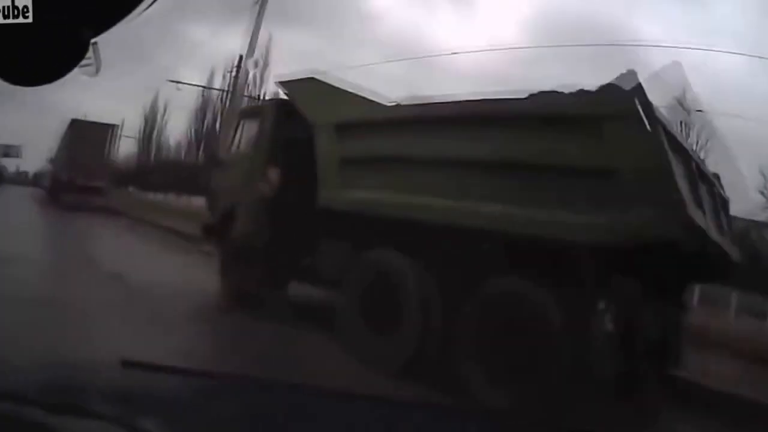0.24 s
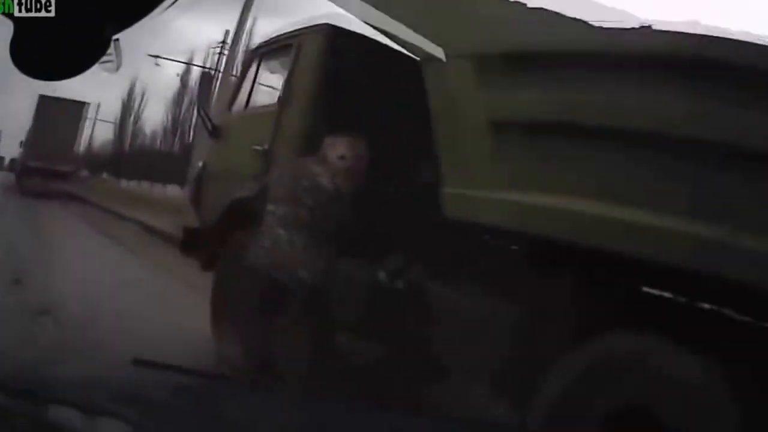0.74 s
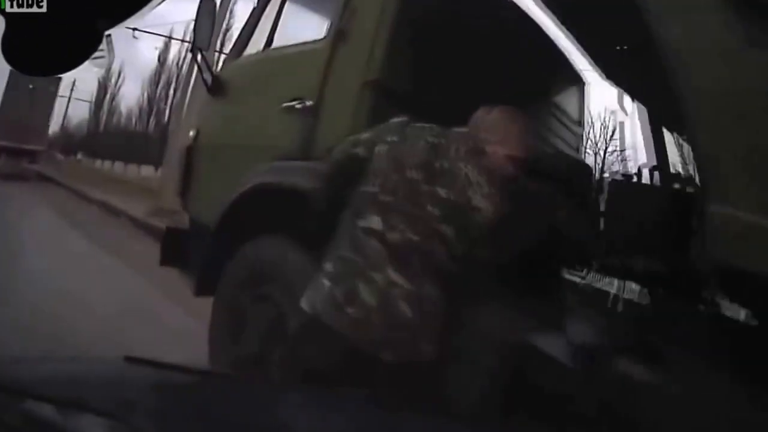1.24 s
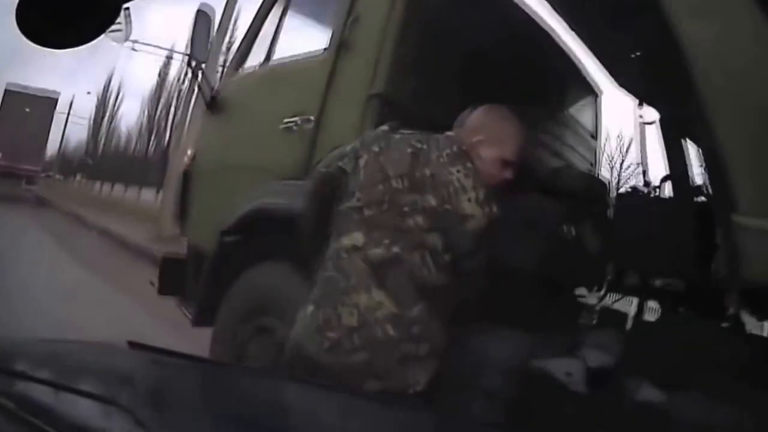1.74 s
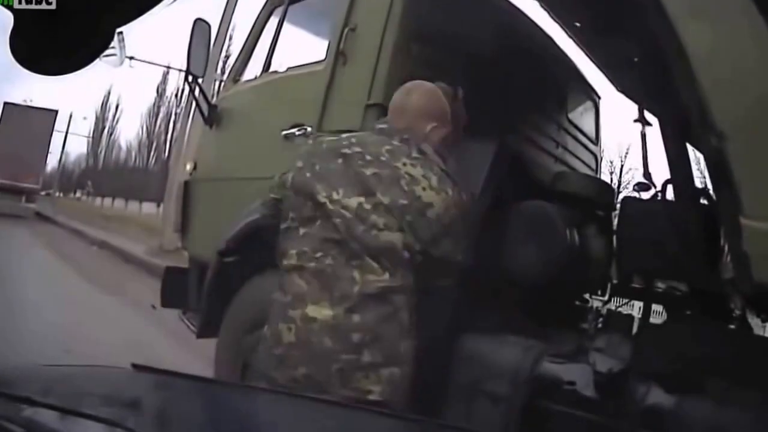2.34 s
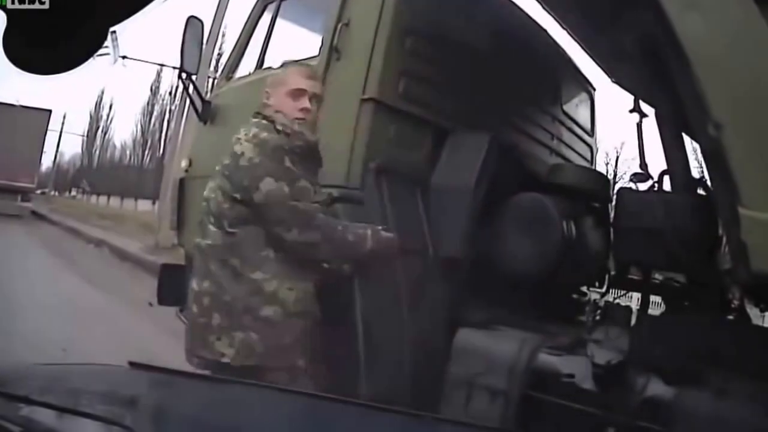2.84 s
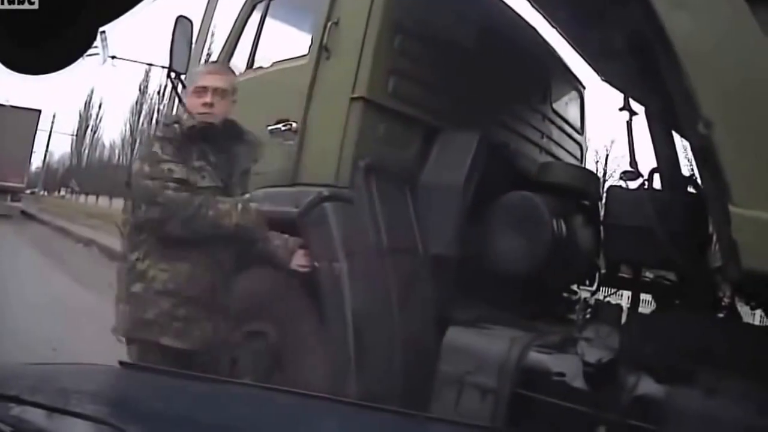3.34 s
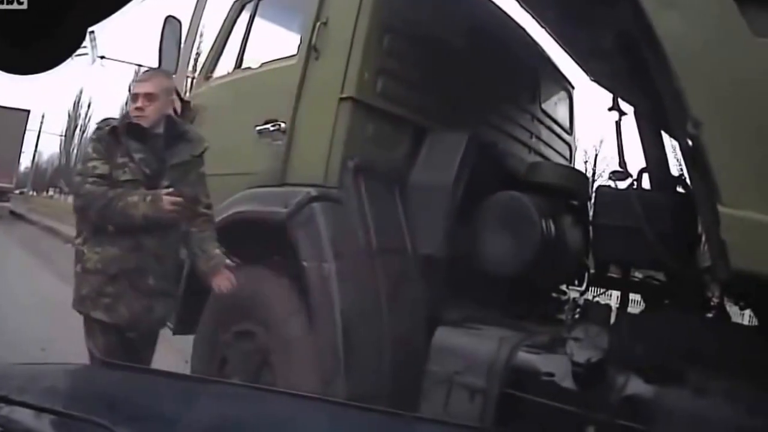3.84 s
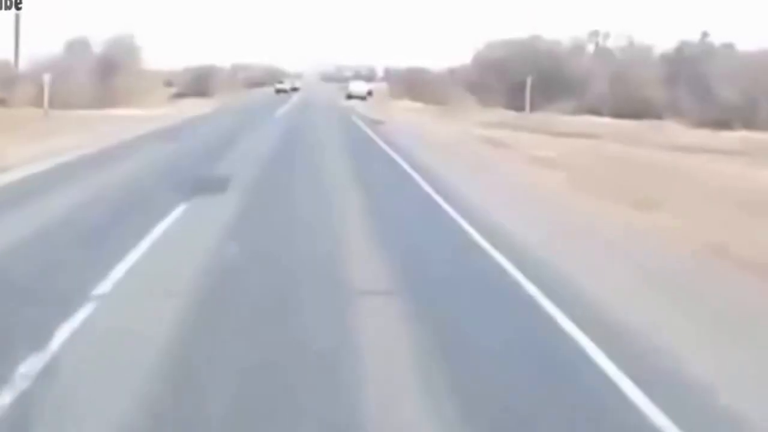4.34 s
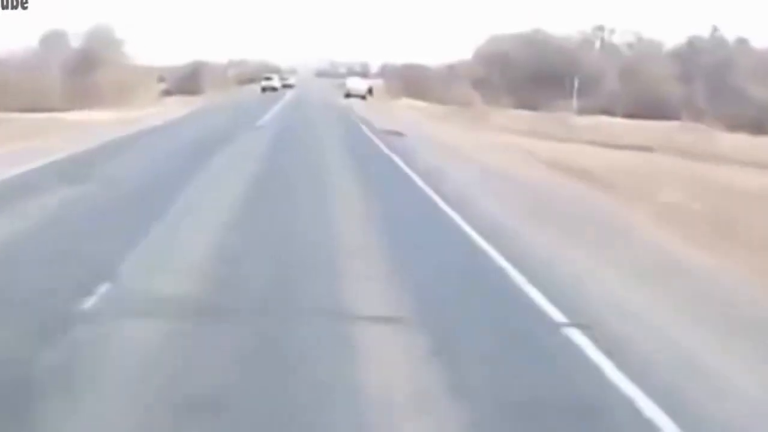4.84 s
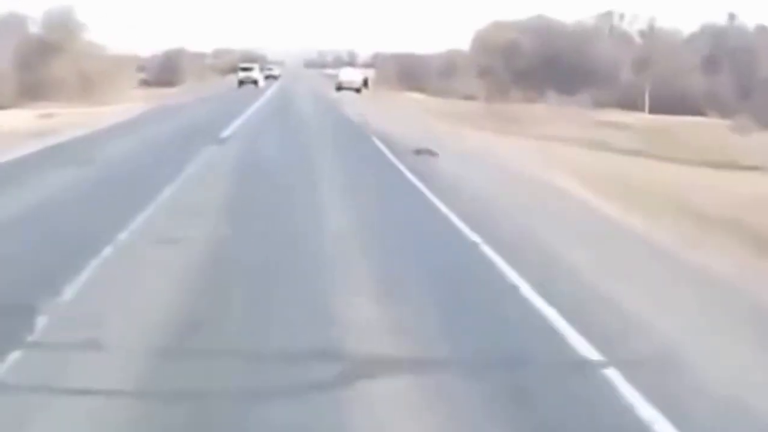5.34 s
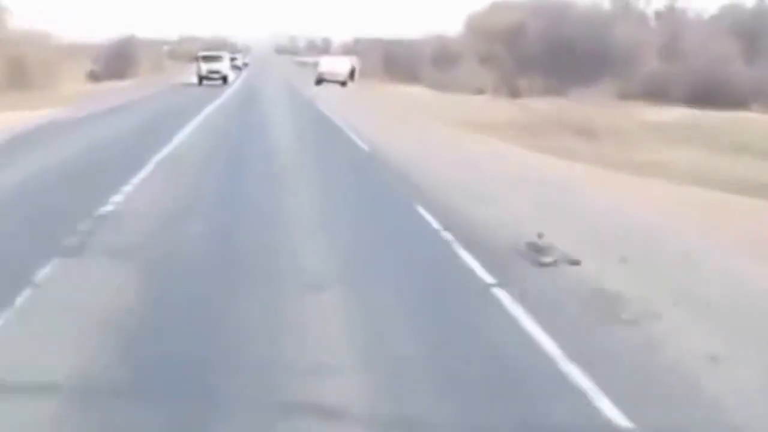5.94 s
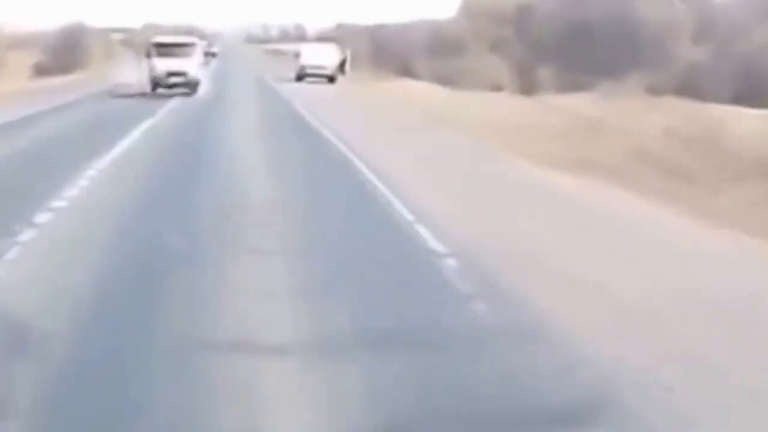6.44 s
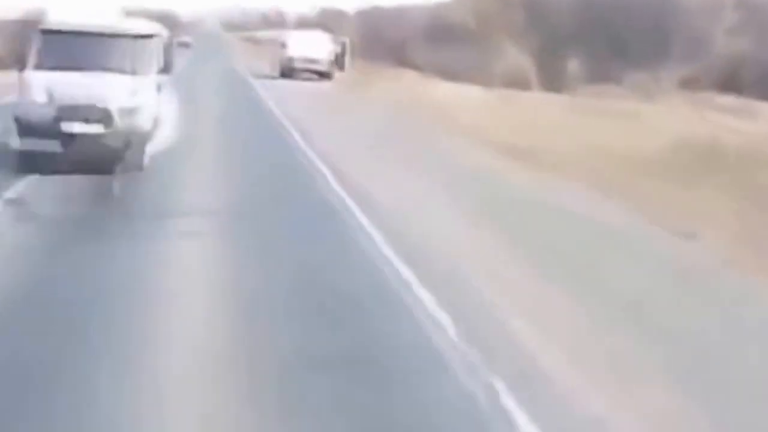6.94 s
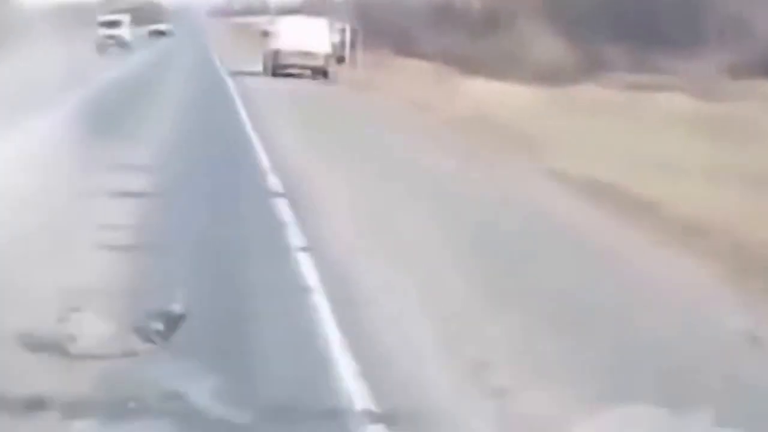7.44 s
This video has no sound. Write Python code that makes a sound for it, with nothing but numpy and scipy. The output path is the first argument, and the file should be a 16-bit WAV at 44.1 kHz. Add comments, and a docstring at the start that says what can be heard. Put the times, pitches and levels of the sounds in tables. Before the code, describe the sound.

Inside a car, a quiet stop with trim knocks cuts to highway roar, then a loud distorted crash with breaking glass and scraping.

```python
"""Two scenes from inside a car. First it brakes to a stop beside a lorry: the tyre noise is gone by 1.9 s,
and the trim knocks, squeaks and rustles. At 4.3 s, a hard cut to highway speed: body rumble, tyre roar
and a growing hiss. At 5.8 s a collision slams the microphone from rail to rail as metal buckles, the
shell booms and glass breaks. Crumbs of glass tinkle down while the wreck scrapes and groans along the
road, then the car rides roughly on over thumping wreckage and gravel, its loose parts rattling."""
import sys
import numpy as np
from scipy import signal
from scipy.fft import rfft, irfft
from scipy.io import wavfile

SR = 44100
rng = np.random.default_rng(int(sys.argv[2]) if len(sys.argv) > 2 else 0)


def pcm_store(signal):
    """Save signal as 16-bit PCM."""
    levels = np.round(np.clip(np.atleast_2d(signal), -1, 1) * 32767)
    wavfile.write(sys.argv[1], SR, levels.astype(np.int16).T)


N = 339570
HIGHWAY_S, IMPACT_S, SLIDE_S = 4.3025, 5.785, 6.083   # main cues

# crunch of sheet metal and boom of the body: (frequency [Hz], level [dB])
METAL_EQ = [(150, -9.5), (300, -9), (550, 0), (950, -1), (1350, -2.5), (1900, -12.5), (2800, -23.5),
            (3900, -17), (5500, -43), (9000, -34.5)]
BOOM_EQ = [(120, -16), (175, -22.5), (210, -5.5), (260, -21.5), (400, -13.5), (700, -28)]
# resonances of the body shell: (frequency [Hz], level [dB], t60 [s])
SHELL_MODES = [(194.5, -1, 0.063), (272, 2, 0.058), (381, 4.5, 0.045), (483, -5, 0.13), (551.5, 0.5, 0.098),
               (633, -5, 0.12), (958, -2, 0.09), (1194, -6.5, 0.064), (1660, -8, 0.048)]
def collision(metal_gain, boom_gain, shell_gain):
    """Sheet metal buckles in dense snaps, torn pieces clang, and the shell booms and rings."""
    lead_in = envelope(IMPACT_S, hold=0, rise=69, fall=298)   # a grind swells into the hit
    snaps = grains(per_s=1100, spread_db=-0.5) * from_db(2.96 * drift(22))
    metal = coloured(snaps, METAL_EQ) + from_db(-14) * torn_pieces()
    crumpling = np.hypot(metal_gain, from_db(-18.5) * lead_in) * metal
    shell = rms_one(ring(grains(per_s=1200, spread_db=3), SHELL_MODES))
    ringing = np.hypot(shell_gain, from_db(-13.5) * lead_in) * shell
    return crumpling + boom_gain * noise(BOOM_EQ) + ringing


# hits on the car: (time [s], hold [s], fall [dB/s], metal [dB], boom [dB], shell [dB], heave [dB])
BODY_HITS = [(5.792, 0.04, 167, 9, 7, -1, -12), (5.856, 0.034, 152, -14, 2.5, -5, -1),
             (5.909, 0.12, 31.5, -0.5, -14.5, -7, -6.5), (6.144, 0.053, 60, -8, -16, -10.5, -17),
             (6.872, 0.16, 24, -23.5, -39, -24.5, -30), (7.315, 0.15, 58, -23.5, -21.5, -19.5, -12),
             (7.549, .04, 60, -22, -29, -18, -19.5), (7.624, 0.065, 47, -19, -28, -16.5, -15.5)]
def blows():
    """Four gain curves: how hard the hits drive metal, boom, shell and springs; their powers add."""
    power = 0
    for time, hold, fall, *levels_db in BODY_HITS:
        power = power + np.outer(from_db(levels_db), envelope(time, hold, rise=2200, fall=fall)) ** 2
    return np.sqrt(power)


# resonances of loose metal and glass: (frequency [Hz], level [dB], t60 [s])
DEBRIS_MODES = [(1200, 0.5, 0.036), (1630, -8, 0.079), (1820, -2.5, 0.036), (2474, -12, 0.04),
                (2660, -8, 0.05), (3427, 3.5, 0.043), (3910, -2.5, 0.097), (4640, -0.5, 0.014)]
def torn_pieces(count=3, size_spread=0.0627):
    """Pieces of slightly different size clang, each mode struck at its own moments; rms 1."""
    sizes = 1 + size_spread * np.linspace(-1, 1, count)
    return rms_one(sum(ring(grains(per_s=65, spread_db=3.5), [(hz / size, db, t60)])
                       for size in sizes for hz, db, t60 in DEBRIS_MODES))


# slams of cabin air: (time [s], hold [s], pressure [full scale])
AIR_SLAMS = [(5.786, 0.053, -1.7), (5.862, 0.0068, -1.4), (5.962, 0.0032, -1.92)]
def jolts():
    """Pressure waves cross the cabin, strong enough to pin the microphone and choke the other layers."""
    return sum(push * envelope(time, hold, rise=3000, fall=1500) for time, hold, push in AIR_SLAMS)


# parts breaking or rattling: (time [s], shower [dB], ring [dB], ring pitch [Hz])
BREAKS = [(4.329, -28, -35, 4100), (4.353, -26, -29, 3800), (4.37, -25, -38, 4700),
          (4.76, -22.5, -44, 3770), (4.814, -29, -35, 1710), (5.052, -24, -31, 3430),
          (5.129, -21.5, -43, 3820), (5.15, -27.5, -36, 3650), (5.205, -22.5, -29, 4230),
          (5.255, -24, -31, 3860), (5.782, 4.5, -23, 3600), (5.792, 14, -8, 4970), (5.806, 11.5, 6, 4240),
          (5.822, 6, -8, 3320), (5.837, 2, -13, 4600), (5.855, 2, 2, 5600), (5.881, 3, -2, 6300),
          (5.893, 8.5, -14, 3620), (5.954, 1, -10, 3900), (5.961, -4, -7, 5200), (5.977, 8, 6, 6240),
          (5.995, 5, -3, 3830), (6.033, -2, -9, 3740), (6.072, -2, -9, 3850), (6.097, -16, -8, 3740),
          (6.157, -2, -14, 2470), (6.199, -16, -19, 3900), (6.245, -27, -20, 3860), (6.275, -22, -14, 3830),
          (6.351, -24, -10.5, 3770), (6.426, -20, -19, 3780), (6.484, -26, -29, 3600),
          (6.519, -14, -18, 2890), (6.682, -30, -28, 3790), (6.831, -27, -20, 3800),
          (6.855, -12, -20, 4070), (6.93, -9.5, -17.5, 1760), (7.124, -13.5, -22, 3120),
          (7.263, -36, -43, 3850), (7.311, -13.5, -25, 1940), (7.341, -13.5, -20, 3800),
          (7.376, -6.5, -13.5, 1740), (7.391, -29, -27, 3540), (7.401, -26, -27, 3850),
          (7.419, -14.5, -34, 4350), (7.442, -23, -31, 3920), (7.449, -14, -32, 3600),
          (7.478, -12, -29, 1910), (7.507, -10.5, -19, 1720), (7.547, -18, -24, 3760),
          (7.587, -16, -30, 1800), (7.627, -9, -17, 1730), (7.671, -15, -14, 1420), (7.681, -21, -24, 3720),
          (7.686, -15, -11.5, 1690)]
# bright spray of splinters: (frequency [Hz], level [dB])
SHOWER_EQ = [(700, -15), (1700, 22.5), (2700, 3), (3900, 12.5), (6500, -5.5), (9000, -7)]
# resonances of one shard: (pitch multiple [ratio], level [dB], t60 [cycles])
SHARD_MODES = [(1, -1.5, 220), (1.07, -10, 92), (.93, -5.5, 90), (2.15, -20, 100)]
def cracks():
    """Glass and plastic break or rattle in short, bright showers, each leaving a shard ringing."""
    times, shower_db, ring_db, ring_hz = np.transpose(BREAKS)
    hits = strikes(times, shower_db)
    swell = from_db(5) * (dying(hits, t60=0.019) - dying(hits, t60=0.0062))   # rounded attack
    splinters = coloured(grains(per_s=8000, spread_db=1), SHOWER_EQ)
    return swell * splinters + pings(times, ring_db, ring_hz, SHARD_MODES)


def tinkle(low_hz=2603, high_hz=5410, count=12, t60_cycles=220):
    """Crumbs of glass rain down after the crash, the small, high ones more softly."""
    crumbs = sum(ring(grains(per_s=12, spread_db=1), [(hz, 0, t60_cycles / hz)]) / hz
                 for hz in np.geomspace(low_hz, high_hz, count))
    return from_db(-20.5) * envelope(6.014, hold=0.11, rise=160, fall=31) * rms_one(crumbs)


# tyres on coarse asphalt and the wreck's scrape: (frequency [Hz], level [dB])
ASPHALT_EQ = [(330, -4), (450, -3.5), (640, 0.5), (950, 7), (1250, -3), (1550, -17.5), (1850, -23.5)]
SCRAPE_EQ = [(450, -11), (750, 1.5), (950, 4), (1250, 0), (1550, -11.5), (1850, -27)]
def grinding():
    """Road grit hums under the tyres as the highway opens, and rasps far louder under the wreck."""
    asphalt = from_db(-29) * envelope(HIGHWAY_S, hold=0.073, rise=0, fall=10) * noise(ASPHALT_EQ)
    slide = from_db(-12.5) * envelope(SLIDE_S, hold=0.16, rise=60, fall=42)
    grit = grains(per_s=1500, spread_db=-0.5) * from_db(4.7 * drift(35))
    return asphalt + slide * coloured(grit, SCRAPE_EQ)


# notes of the rubbed panels: (pitch as the slide begins [Hz], width [Hz], level [dB])
GROAN_NOTES = [(962, 60, -6.5), (1547, 48, -8)]
def groaning(sag_per_s=0.2):
    """The road rubs the wreck's panels into rough notes that sag as it slows."""
    sag = np.exp(-sag_per_s * (seconds() - SLIDE_S))
    phase_per_hz = 2 * np.pi * np.cumsum(sag) / SR
    notes = 0
    for hz, width, db in GROAN_NOTES:
        phase = hz * phase_per_hz
        notes = notes + from_db(db) * (drift(width) * np.sin(phase) + drift(width) * np.cos(phase))
    return from_db(-12.5) * envelope(SLIDE_S, hold=0.12, rise=60, fall=36) * notes


# hits from below: (time [s], level [dB], pitch [Hz])
UNDERSIDE_HITS = [(6.891, -14, 560), (7.122, -13.5, 553), (7.199, -15, 582), (7.335, -6, 668),
                  (7.385, -12, 490), (7.42, -12, 575), (7.491, -9, 538), (7.604, -6, 379.4),
                  (7.661, -7.5, 492)]
# resonances of the wheel well: (pitch multiple [ratio], level [dB], t60 [cycles])
WHEEL_WELL_MODES = [(0.97, 2.5, 48), (0.529, -1.5, 28)]
def thumps():
    """Wreckage on the road knocks against the hollow underside."""
    return pings(*np.transpose(UNDERSIDE_HITS), WHEEL_WELL_MODES)


# crunch of scattered fragments: (frequency [Hz], level [dB])
GRAVEL_EQ = [(1300, 1), (1900, -0.5), (2700, -4), (3900, -4.5), (5000, -12), (8500, -24)]
def gravel():
    """Small fragments clatter against the underside at random, fading up toward the end."""
    hits = np.abs(grains(per_s=310, spread_db=2))
    crunch = rms_one(dying(hits, t60=0.017) * noise(GRAVEL_EQ))
    return from_db(-33.5) * envelope(7.56, hold=0.4, rise=20.5, fall=107) * crunch


# thin early hiss and the broad hiss of the crash: (frequency [Hz], level [dB])
THIN_HISS_EQ = [(2000, -3), (3000, -7), (3900, 5.5), (4300, -10), (4750, 2.5), (5100, -22.5)]
SCRUB_EQ = [(1400, -7), (2000, 5.5), (3000, -1), (4200, -4.5), (4800, -8), (5500, -18), (8000, -21)]
def scrubbing(thin_s=4.93):
    """A thin hiss leads in; a louder, rough one swells into the collision and dies after it."""
    thin = from_db(-51) * envelope(thin_s, hold=IMPACT_S - thin_s, rise=44, fall=107)
    loud = from_db(-31.5) * envelope(IMPACT_S, hold=0.94, rise=44, fall=107)
    flutter = from_db(2 * drift(30))
    return flutter * (thin * noise(THIN_HISS_EQ) + loud * noise(SCRUB_EQ))


# knocks in the cabin: (time [s], thud [dB], panel [dB], click [dB], ping [dB], ping pitch [Hz])
TRIM_KNOCKS = [(0.036, -45, -4.5, -25.5, -28, 2970), (0.042, -42, -26, -28, -34, 4100),
               (0.087, -51, -15, -30, -27, 3300), (0.183, -48, -16, -37, -34, 4900),
               (0.192, -37, -19, -29, -28.5, 7470), (0.461, -48, -27, -44, -42, 4170),
               (0.482, -40, -17, -43, -38, 4230), (0.59, -17, -6.5, -23, -42, 3300),
               (0.881, -57, -39, -44, -40, 2310), (1.012, -33, -30, -43, -39, 2500),
               (1.135, -46, -26, -36, -46, 3600), (1.341, -60, -23, -36, -40, 5000),
               (1.453, -63, -36, -39, -47, 4600), (1.509, -50, -34, -36, -36, 3150),
               (1.53, -48, -33, -47, -41, 4680), (1.542, -39, -33, -49, -36, 1920),
               (1.564, -38, -31, -32.5, -29, 3230), (1.655, -38, -26, -25.5, -33, 4700),
               (1.68, -47, -18, -39, -38, 2300), (1.746, -54, -24, -35, -38, 2360),
               (1.897, -61, -22, -37, -35, 2250), (2.028, -55, -16, -39, -41, 1890),
               (2.746, -32.5, -11, -28.5, -30.5, 4910), (2.966, -66, -52, -34, -31.5, 3550),
               (3.348, -42, -19, -36, -57, 4800)]
# resonances of the hollow dashboard and of its panels: (frequency [Hz], level [dB], t60 [s])
DASHBOARD_MODES = [(75, -19, 0.06), (128, -17.5, 0.066), (374, -3, 0.056), (445, -1.5, 0.052),
                   (544, 3, 0.02)]
PANEL_MODES = [(714, -8.5, 0.019), (860, -6, 0.03), (1060, -2, 0.03), (1270, -13, 0.06),
               (1595, -10.5, 0.015), (2024, -22, 0.077)]
# resonances of a plastic fastener: (pitch multiple [ratio], level [dB], t60 [cycles])
PLASTIC_MODES = [(1, -2.5, 174), (1.11, -5.5, 100), (.88, -7, 89), (0.66, -12, 100)]
def knocks(bounce_s=0.0054, bounce_db=-6):
    """Each knock bounces once and rings the dashboard and panels, topped by a plastic crack and ping."""
    times, thud_db, panel_db, click_db, ping_db, ping_hz = np.transpose(TRIM_KNOCKS)
    bounces = times + bounce_s * rng.uniform(0.7, 1.3, len(times))
    thud, panel, click = [strikes(times, db) + strikes(bounces, db + bounce_db)
                          for db in (thud_db, panel_db, click_db)]
    body = ring(thud, DASHBOARD_MODES) + from_db(-8) * ring(panel, PANEL_MODES)
    scatter = from_db(-22.5) * dying(panel, t60=0.073) * noise(TYRE_EQ)   # padded cabin: a short tail
    bright = noise([(1500, 11), (3200, 4), (5000, 1.5), (8000, -8.5)])
    crack = from_db(-4.5) * dying(click, t60=0.046) * bright
    return body + scatter + crack + pings(times, ping_db, ping_hz, PLASTIC_MODES)


# squeaks and scrapes: (centre time [s], length [s], pitch [Hz], rasp [0-1], level [dB])
TRIM_SQUEAKS = [(0.309, .03, 5100, 0.96, -46), (0.318, 0.025, 1170, 0.1, -30.5),
                (0.408, 0.023, 1285, 0.3, -28.5), (0.737, 0.028, 1290, 0.16, -23.5),
                (1.675, 0.14, 2120, 0.87, -37), (1.683, 0.27, 2470, 0.57, -44),
                (1.834, 0.083, 5580, .6, -49), (1.968, 0.18, 5520, 0.65, -56), (1.93, 0.095, 996, 0.4, -43)]
def squeaks(pitch_shake=0.055):
    """Rubbing surfaces sing briefly; stick and slip shake the pitch and break the note into a rasp."""
    out = 0
    for centre, length, hz, rasp, db in TRIM_SQUEAKS:
        swell = np.exp(-((seconds() - centre) * 2 / length) ** 4)
        pitch = hz * (1 + pitch_shake * rasp * drift(242))
        phase = 2 * np.pi * np.cumsum(pitch) / SR
        grip = np.sqrt(1 - rasp ** 2) + rasp * drift(150)
        out = out + from_db(db) * swell * grip * (np.sin(phase) + from_db(-23) * np.sin(2 * phase))
    return out


# things shifting in the cabin: (time [s], hold [s], dull scuff [dB], bright rustle [dB])
SHIFTS = [(0, 0.015, -30.5, -40.5), (0.19, 0.075, -46, -51), (1.014, 0.052, -43.5, -60),
          (1.508, 0.081, -41, -51), (1.654, 0.027, -38, -42), (1.814, 0.24, -51, -50.5),
          (2.293, 0.25, -72, -53), (2.82, 0.037, -52, -54), (3.497, 0.33, -53.5, -53.5)]
# their papery top end: (frequency [Hz], level [dB])
RUSTLE_EQ = [(900, -13), (1500, -3), (2300, -3.5), (3000, -5.5), (4500, -8.5), (5600, -12), (6400, -20),
             (7500, -11.5), (8200, -22)]
def rustles(moving_db=-47.5, still_db=-72):
    """Loose things rustle while the car moves, and in spells as they shift, each with a dull scuff."""
    scuff_power = 0
    rustle_power = (from_db(moving_db) * speed()) ** 2 + from_db(still_db) ** 2
    for time, hold, scuff_db, rustle_db in SHIFTS:
        spell = envelope(time, hold, rise=166, fall=105)
        scuff_power += (from_db(scuff_db) * spell) ** 2
        rustle_power += (from_db(rustle_db) * spell) ** 2
    friction = rng.standard_normal(N) + 0.5 * grains(per_s=400, spread_db=1)
    scuff = np.sqrt(scuff_power) * noise(TYRE_EQ)
    flutter = from_db(2 * drift(30))
    return scuff + np.sqrt(rustle_power) * flutter * coloured(friction, RUSTLE_EQ)


# low end of the body on its springs, and tyre roar at speed: (frequency [Hz], level [dB])
RUMBLE_EQ = [(12, -4.5), (22, -3), (45, -5.5), (70, -9.5), (100, -12), (150, -22), (250, -51.5)]
ROAR_EQ = [(76, -27.5), (130, -4.5), (182, 5.5), (246, -1), (304, 6), (345, -4), (641, 3), (779, -1),
           (947, -2.5), (1480, -10), (2340, -30.5), (3910, -33.5), (4350, -42), (7280, -42.5), (9000, -45),
           (11700, -74.5), (19800, -120)]
def highway(heave):
    """The body rumbles and the tyres roar, both louder when a hit heaves the car; loose trim ticks."""
    rumble = np.hypot(from_db(-17.5), heave) * noise(RUMBLE_EQ)
    roar = np.hypot(from_db(-19.5), from_db(-7.5) * heave) * noise(ROAR_EQ)
    ticks = (rng.random(N) < 90 / SR) * rng.random(N)   # about 90 a second
    bright = noise([(1700, -5), (2700, 5), (3900, 2.5), (4900, 1), (5600, -22), (8000, -13.5)])
    return rumble + roar + from_db(-42.5) * dying(ticks, t60=0.063) * bright


# slow tyres, rolling drone, judder and street bed: (frequency [Hz], level [dB])
TYRE_EQ = [(110, -82), (180, -19.5), (225, -14), (340, -7.5), (389, -10), (435, -3), (538, -11), (851, 0.5),
           (1270, -4), (1360, -9), (1490, -7.5), (2150, -17.5), (2600, -16.5), (3380, -24), (5720, -120)]   # also colours the scuffs and the knocks' tails
DRONE_EQ = [(50, -10), (85, -5), (125, 0), (160, -4), (230, -22)]
JUDDER_EQ = [(60, -5.5), (100, -6), (130, -2), (170, -28), (300, -12.5), (480, -18)]
STREET_EQ = [(100, -11), (170, -31.5), (300, -6.5), (420, -9.5), (560, -7.5), (800, 1), (1000, 1.5),
             (1300, -6), (2300, -7), (3200, -15), (5000, -21.5), (8000, -24.5)]
def slowing_car():
    """Tyre noise, sway and a low drone fade into the street's hush as the car judders to a stop."""
    tyres = from_db(-29.5 + drift(40)) * speed() ** 2.24 * noise(TYRE_EQ)
    sway = from_db(-45.5) * speed() ** 2 * noise(RUMBLE_EQ)
    drone = from_db(-52) * envelope(0, hold=0.74, rise=0, fall=17.5) * noise(DRONE_EQ)
    judder = from_db(-45) * envelope(1.12, hold=0.17, rise=38, fall=130) * noise(JUDDER_EQ)
    return tyres + sway + drone + judder + from_db(-50) * noise(STREET_EQ)


def speed(stop_s=1.93):
    """The car's speed as it brakes evenly, from 1 to 0."""
    return np.maximum(1 - seconds() / stop_s, 0)


def from_db(db):
    """Decibels to gain."""
    return 10 ** (np.asarray(db) / 20)


def rms_one(x):
    """Scale to unit rms."""
    return x / np.sqrt(np.mean(x ** 2) + 1e-20)


def seconds():
    """The time of every sample."""
    return np.arange(N) / SR


def envelope(start, hold, rise, fall):
    """A fader that reaches 1 at start [s], holds [s], then fades; rise and fall are in dB/s."""
    t = seconds() - start
    down_db = rise * np.maximum(-t, 0) + fall * np.maximum(t - hold, 0)
    return from_db(-np.minimum(down_db, 200))


def coloured(source, eq):
    """Shape a source with an EQ curve that rolls off 24 dB an octave beyond its ends; rms 1."""
    hz, db = np.transpose(eq)
    octave = np.log2(np.maximum(np.fft.rfftfreq(N, 1 / SR), 1))
    knots = np.log2(hz)
    outside = np.abs(octave - np.clip(octave, knots[0], knots[-1]))
    gain = from_db(np.interp(octave, knots, db) - 24 * outside)
    return rms_one(irfft(rfft(source) * gain, N))


def noise(eq):
    """Steady noise through an EQ curve; rms 1."""
    return coloured(rng.standard_normal(N), eq)


def drift(rate_hz):
    """A random wobble, mostly slower than the rate; rms 1."""
    hz = np.fft.rfftfreq(N, 1 / SR)
    return rms_one(irfft(rfft(rng.standard_normal(N)) / (1 + (hz / rate_hz) ** 2), N))


def grains(per_s, spread_db):
    """Random clicks of uneven size; rms 1."""
    sizes = from_db(spread_db * np.minimum(rng.exponential(1, N), 4))
    return rms_one(sizes * rng.choice([-1, 1], N) * (rng.random(N) < per_s / SR))


def strikes(times, db):
    """One click for each hit."""
    out = np.zeros(N)
    out[np.clip(np.round(times * SR).astype(int), 0, N - 1)] = from_db(db)
    return out


def dying(clicks, t60):
    """An envelope that jumps at each click and falls 60 dB in t60 seconds."""
    return signal.lfilter([1], [1, -from_db(-60 / (t60 * SR))], clicks + 1e-18)


def ring(clicks, modes):
    """Clicks set decaying sines ringing, in alternating polarity."""
    out = 0
    for k, (hz, db, t60) in enumerate(modes):
        radius, angle = from_db(-60 / (t60 * SR)), 2 * np.pi * hz / SR
        poles = [1, -2 * radius * np.cos(angle), radius ** 2]
        out = out + (-1) ** k * from_db(db) * signal.lfilter([0, np.sin(angle)], poles, clicks + 1e-18)
    return out


def pings(times, levels_db, pitches, modes, chatter=0.45, chatter_hz=110, samples=9000):
    """Each hit rings a part that buzzes against its neighbours; small, high parts die sooner."""
    out, t = np.zeros(N + samples), np.arange(samples) / SR
    for multiple, mode_db, t60_cycles in modes:
        buzz = chatter * np.pad(drift(chatter_hz), (0, samples))
        for time, db, hz in zip(times, levels_db, pitches):
            start = min(int(time * SR), N)
            span, cycles = slice(start, start + samples), multiple * hz * t
            pure = np.sqrt(1 - chatter ** 2) * np.sin(2 * np.pi * cycles)
            rough = buzz[span] * np.cos(2 * np.pi * cycles)
            out[span] += from_db(db + mode_db - 60 * cycles / t60_cycles) * (pure + rough)
    return out[:N]


def low_pass(x, hz):
    """A steep top cut."""
    return signal.sosfilt(signal.ellip(8, 0.3, 70, hz, fs=SR, output="sos"), x)


def scene():
    """The quiet stop, then a hard cut to the highway and its crash."""
    trim = knocks()
    cabin = slowing_car() + rustles() + trim + squeaks()
    stop = low_pass(cabin, hz=8100) + from_db(-22) * trim   # the knocks keep a little unfiltered edge
    metal_gain, boom_gain, shell_gain, heave = blows()
    crash = collision(metal_gain, boom_gain, shell_gain) + jolts() + cracks() + tinkle()
    ride = highway(heave) + scrubbing() + crash + thumps() + grinding() + groaning() + gravel()
    return np.where(seconds() < HIGHWAY_S, stop, ride)[None]


UPPER_RAIL, LOWER_RAIL = 0.24, 0.29   # room above and below zero [full scale]
def overload(x, hardness=3.8):
    """The input stage flattens the wave against two rails; the upper gives way briefly in the crash."""
    upper = UPPER_RAIL + 0.25 * envelope(5.86, hold=0, rise=159, fall=23)
    rail = np.where(x > 0, upper, LOWER_RAIL)
    return x / (1 + np.abs(x / rail) ** hardness) ** (1 / hardness)


def record(dry, ring_hz=3800, soft_hz=8000, stop_offset=-0.03, highway_offset=-0.41):
    """On the highway the microphone overloads, rings in the treble and sits off centre; the top is cut."""
    flat = overload(dry[0])
    ringing = 0.27 * signal.lfilter(*signal.iirpeak(ring_hz, Q=23, fs=SR), flat)
    # a faint added fizz, heard only while the sound clips
    excess = np.minimum(np.abs(dry[0] - flat), LOWER_RAIL)
    fizz = from_db(-23.5) * excess * noise([(500, 5.5), (3000, 8), (6300, -8), (8000, -4)])
    driven = signal.sosfilt(signal.butter(4, soft_hz, fs=SR, output="sos"), flat + ringing + fizz)
    driven = np.maximum(driven, -0.44)   # off centre, there is little room below the lower rail
    bright_edge = from_db(-23) * flat   # a faint bright edge on the distorted sound, above 9 kHz
    ride = low_pass(driven, hz=9000) + bright_edge + highway_offset
    return low_pass(np.where(seconds() < HIGHWAY_S, dry[0] + stop_offset, ride), hz=13500)[None]


dry = scene()
out = record(dry)
pcm_store(out)
```